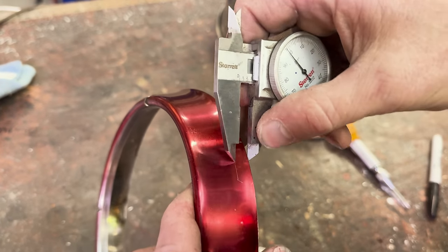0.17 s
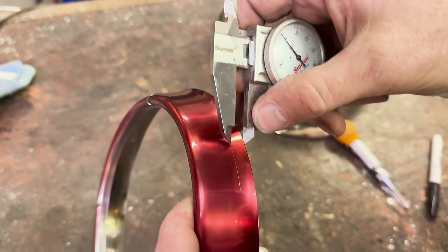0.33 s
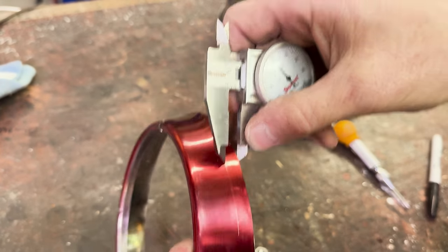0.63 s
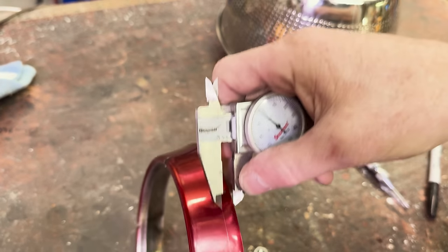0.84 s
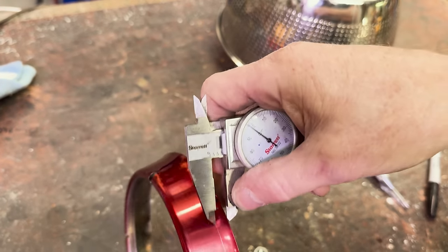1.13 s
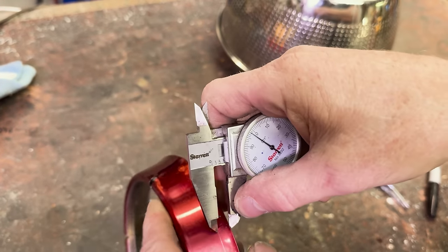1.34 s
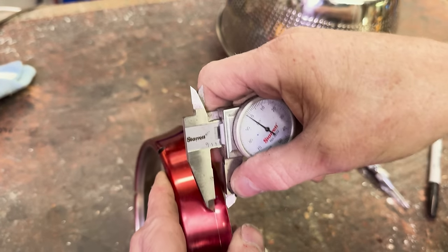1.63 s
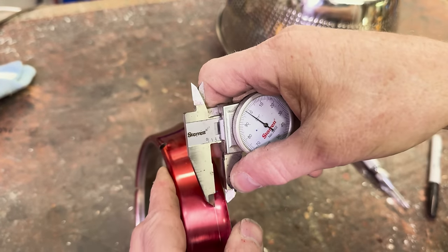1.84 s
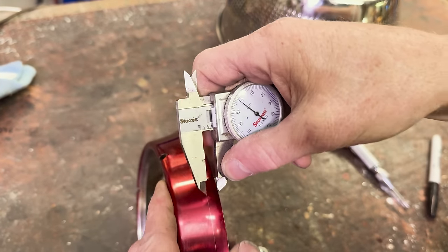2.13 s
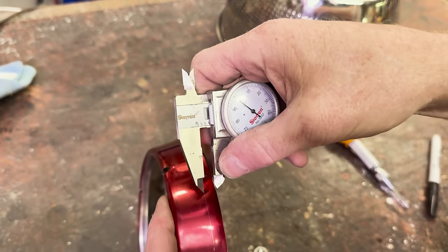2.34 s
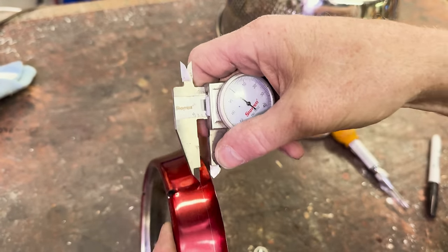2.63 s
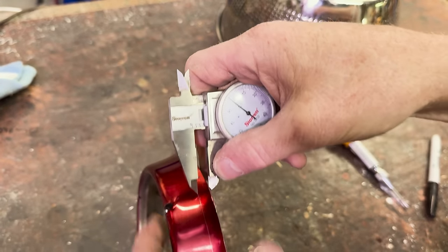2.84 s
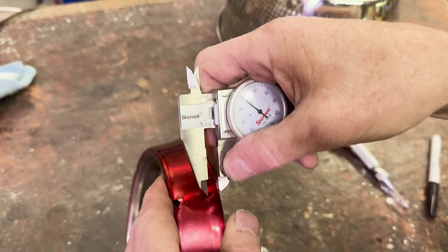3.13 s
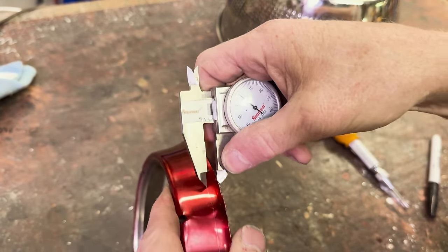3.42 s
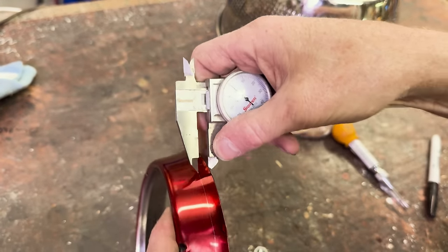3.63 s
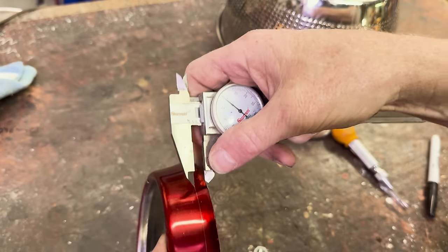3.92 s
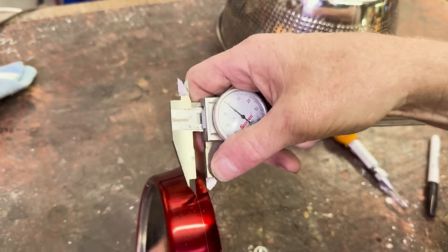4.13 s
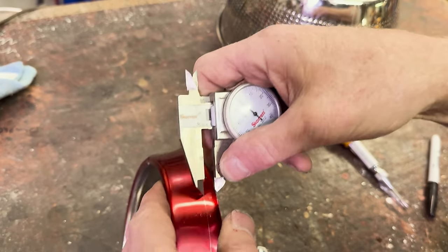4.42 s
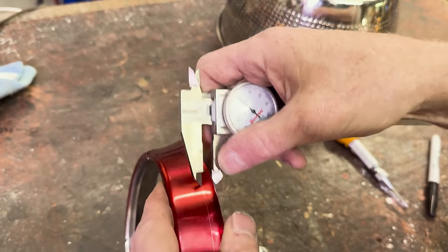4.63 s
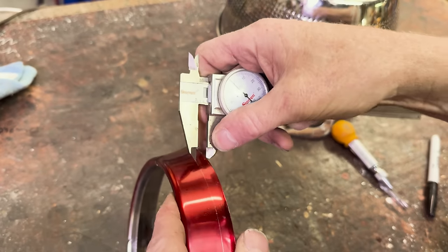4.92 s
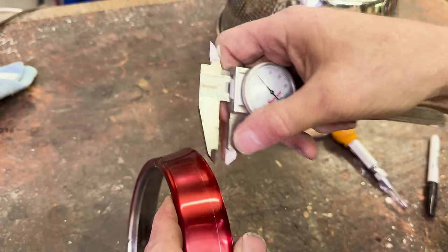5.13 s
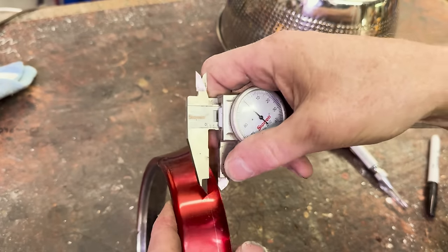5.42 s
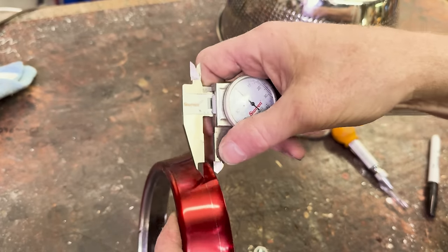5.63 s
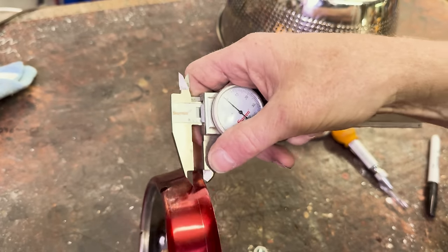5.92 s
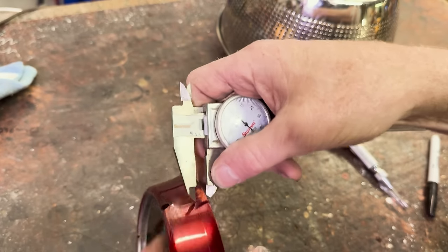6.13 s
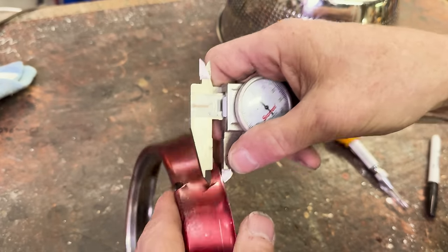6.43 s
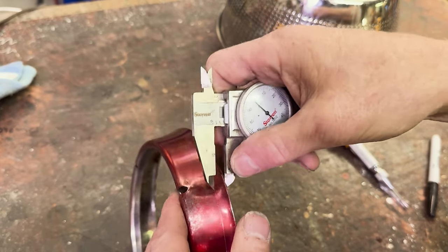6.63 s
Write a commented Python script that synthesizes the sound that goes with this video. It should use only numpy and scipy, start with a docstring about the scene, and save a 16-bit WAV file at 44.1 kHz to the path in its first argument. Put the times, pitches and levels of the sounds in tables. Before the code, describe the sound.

Close to a phone in a small workshop, a steel tip works on a hand-held metal ring over quiet low air rumble and faint motor hum. From 0 to 0.6 s, quick gritty scratches mix with small ticks. Light hissing skims, soft bumps and faint breath-like swishes follow, with a clear click at 1.5. Weak scrapes run from 1.9 to 2.4, then a brighter one at 2.5. A sharp tick at 3.0 leads to stronger, ringing scratches from 3.3 to 3.6, a tap at 3.64 and brief scrapes to 3.95. Thin skims and ticks fill 4.0 to 4.4. A loud crack at 4.6 starts two rough strokes; after a soft lull, two harder cracks hit around 5.35, followed by scratches until 5.9. Fine, fading hisses and a tiny tap end it by 7 s. The ring sounds short and damped, with slight room reflections.

```python
"""A caliper's jaw tip scribes a hand-held steel ring in short strokes, close to a phone above a workbench. The
tip sticks and slips in dense tiny jerks that ring the hand-damped ring and the bright jaws. Between strokes it
skims lightly, giving a fine hiss, or taps down and chatters with a dry crack. Faint breath-like swishes and
dull bumps join in, some as hard taps push the whole ring, others as the hands shift; a small workshop adds
reflections, air rumble and a low hum. A soft limit rounds the loudest peaks, and the top treble is cut."""
import sys
import numpy as np
from scipy import signal
from scipy.fft import rfft, irfft
from scipy.io import wavfile
from scipy.ndimage import uniform_filter1d

SR = 44100
rng = np.random.default_rng(int(sys.argv[2]) if len(sys.argv) > 2 else 0)


def materialize(psi):
    """Save the field psi as 16-bit PCM at rate SR to the path in sys.argv[1].

    A 1-D psi becomes a single channel; in a 2-D psi each row is a channel.
    """
    bounded = np.clip(np.atleast_2d(psi).T, -1, 1)
    quanta = np.round(bounded * 32767).astype(np.int16)
    wavfile.write(sys.argv[1], SR, quanta)


N = 298557

# pressed strokes: start_s, attack_s, hold_s, release_s, jaw_level_db (before a trim),
# ring_db (relative to the jaws, halfway), dig_db (what the ring gains as the tip digs in)
PRESSED_STROKES = [(0.072, 0.018, 0.038, 0.058, -37, 1, 7), (0.195, 0.044, 0.081, 0.064, -34.5, 4, -5.5),
                   (0.322, 0.037, 0.053, 0.11, -33, 3, -3), (0.502, 0.042, 0.0045, 0.023, -35.5, 5, -7.5),
                   (1.9, 0.077, .02, 0.023, -45, 9, 3), (1.996, 0.012, .1, 0.15, -46, 0.5, 5.5),
                   (2.162, 0.032, 0.12, 0.072, -51.5, 0, -1.5), (2.291, 0.035, 0.05, 0.19, -49, -0.5, 1.5),
                   (2.468, 0.04, 0.046, 0.079, -34.5, -7, 8.5), (3.271, 0.08, 0.028, 0.023, -33, -4.5, 5),
                   (3.453, 0.018, 0.03, .04, -43, -2.5, -14), (3.49, 0.087, 0.034, 0.061, -28, 3, -4.5),
                   (3.829, 0.016, 0.0064, 0.033, -48.5, -2, 6), (3.878, 0.015, 0.031, 0.024, -37, -5.5, 6),
                   (3.905, 0.019, 0.0088, 0.012, -36.5, 4, -3.5), (4.62, .008, 0.088, 0.12, -31.5, -6, 3),
                   (4.73, 0.028, 0.04, 0.052, -35.5, -4, -11), (4.897, 0.071, 0.0046, 0.045, -50, -3.5, 7),
                   (5.375, .005, .01, 0.057, -38, -24, -7), (5.472, 0.051, 0.057, 0.036, -29.5, -0.5, -3.5),
                   (5.724, 0.036, 0.023, 0.067, -34, 1.5, 0), (5.794, 0.025, 0.019, 0.1, -37.5, 4, -5.5)]
# how the tip bites from each time on: start_s, midrange_db, slip_unevenness_db
TIP_GRIPS = [(0, -5.5, 2), (1.8, -0.5, 2.5), (2.4, -1, 1.5), (3.2, -2.5, 1.5), (4.5, -2.5, 0.5),
             (5.4, -3.5, 1.3), (5.7, -3, 3.5)]
# the tip skims with almost no pressure: start_s, attack_s, hold_s, release_s, level_db (before trims)
LIGHT_SKIMS = [(0.598, 0.012, 0.028, 0.19, -55.5), (0.784, 0.017, .015, 0.27, -68.5),
               (1.023, 0.051, 0.091, 0.055, -57.5), (1.208, 0.059, .02, 0.14, -53.5),
               (1.377, 0.017, .005, 0.084, -60), (1.468, 0.021, 0.019, 0.09, -52),
               (2.693, 0.061, 0.014, 0.097, -50.5), (2.892, .018, 0.055, 0.0067, -49.5),
               (3.772, 0.018, .003, 0.057, -55.5), (4.034, 0.012, 0.016, 0.11, -51.5),
               (4.078, 0.027, .015, .08, -53.5), (4.161, 0.023, .01, 0.041, -55.5),
               (4.227, 0.014, 0.038, 0.092, -43.5), (4.489, .015, .015, 0.037, -73),
               (5.937, 0.03, 0.0086, 0.067, -57.5), (6.005, 0.024, .005, 0.055, -49.5),
               (6.061, 0.032, 0.011, 0.04, -54), (6.131, 0.0046, 0.015, 0.099, -41),
               (6.205, 0.023, .01, 0.1, -47.5), (6.365, 0.023, 0.055, .08, -70.5),
               (6.529, .011, 0.0075, 0.047, -49.5), (6.635, 0.016, 0.026, .04, -65),
               (6.731, 0.016, 0.017, .04, -67)]
# the tip lands or catches: start_s, jaw_level_db, midrange_level_db, ring_level_db
TIP_TAPS = [(0.003, -43.5, -52.5, -41), (0.052, -53, -56, -45), (0.0731, -45, -47, -38),
            (0.089, -28.5, -55, -34), (0.211, -42, -51, -38.5), (0.234, -62, -43, -36),
            (0.441, -47, -42, -25.5), (0.46, -50.5, -43, -44), (0.490, -45, -41, -32.5),
            (0.542, -41, -40, -32.5), (0.562, -44, -43, -35.5), (0.8958, -40.5, -54, -40.5),
            (0.933, -61, -56, -50), (1.5096, -30, -36, -36), (1.703, -78, -82, -60),
            (1.8884, -79, -70, -53), (1.9098, -61, -77, -47.5), (2.9739, -25, -36, -39),
            (3.257, -45, -61.5, -57), (3.2818, -73, -64, -39.5), (3.4187, -46, -51, -45.5),
            (3.476, -38, -43, -33), (3.642, -29, -33.5, -26), (3.823, -50, -60, -45),
            (3.9199, -33, -33, -22.5), (4.2863, -44, -37.5, -32), (4.363, -53, -54.5, -41),
            (4.369, -33.5, -39.5, -39.5), (4.609, -15, -18.5, -16.5), (5.3475, -17.5, -21, -19.5),
            (5.375, -11, -16, -17), (5.682, -54, -46, -51), (5.699, -44, -48, -43), (5.7425, -35, -43, -30),
            (6.642, -65, -66, -47.5)]
# modes of the ring (low) and the caliper jaws (high): pitch_hz, width_hz (before damping), level_db
STEEL_MODES = [(500, 320, -7), (893, 327, 0), (1094, 240, -3.5), (1343, 76, -2.5), (1684, 200, 0.5),
               (1903, 480, 1.5), (2230, 290, 3.5), (2523, 430, 1.5), (3260, 83, -19.5), (3645, 120, -7.5),
               (4080, 190, -4.5), (4460.0, 140, -4.5), (4900, 1000, -13.5), (5985, 210, -11.5),
               (6430, 200, -11.5), (7057, 54, -4), (7356, 140, -4), (7714, 190, -4.5), (8100, 373.0, -8),
               (8560, 220, -7), (8870, 170, -8.5), (9310, 510, -8), (10140, 390, -10), (11070, 530, -12.5),
               (11930, 170, -8.5), (11880, 270, -15), (13000, 210, -9.5), (14000, 300, -17),
               (14370, 211.0, -26)]
# spectrum of the workshop air: pitch_hz, relative_level_db (per Hz)
SHOP_AIR = [(25, -44.5), (40, -21.5), (58, 1), (110, 0), (170, -3.5), (260, -15.5), (400, -21), (1000, -21),
            (2500, -28.5), (6000, -37), (12000, -49.5), (16000, -63.5)]
# motor hum lines: pitch_hz, level_db (rms, before wavering)
MOTOR_HUM = [(94.7, -64), (122, -68)]
# room tail: pitch_hz, t60_s
ROOM_DECAY = [(200, 0.61), (1000, 0.27), (3000, 0.32), (8000, 0.33), (16000, 0.11)]
# each hold of the fingers deadens one resonance and leaves four free, until the next hold:
# start_s, deadened_hz, free_hz (four columns), emphasis_db
FINGER_HOLDS = [(0, 1700, 1260, 2080, 2146, 7960, 6.6), (0.7, 3200, 1650, 2100, 6200, 7740, 6),
                (1.4, 3200, 1450, 1690, 2660, 5910, 20), (1.6, 537, 340, 800, 1140, 2560, 5.9),
                (2.4, 1400, 890, 2210, 4330, 6950, 6.1), (2.97, 8400, 1643, 5130, 5630, 6240, 22.7),
                (3.2, 1400, 1060, 1850, 4180, 12900, 4.3), (3.75, 1520, 1050, 2070, 2240, 4270, 7.6),
                (4.1, 5000, 1440, 1850, 2530, 3540, 14.5), (4.55, 1950, 2680, 3650, 7150, 8570, 8.1),
                (4.615, 2100, 970, 2580, 8250, 12750, 3.2), (5.3, 5200, 2430, 3440, 4250, 7930, 11),
                (5.45, 6400, 920, 1980, 7400, 8300, 3.1), (5.92, 4630, 2400, 5900, 7200, 8400, 6.7)]
# dull bumps, as hard taps push the whole ring or the hands shift their hold: start_s, pitch_hz, level_db
DULL_BUMPS = [(0.908, 111, -44), (0.938, 181, -44), (0.976, 160, -50), (1.037, 159, -44.5),
              (1.057, 94.5, -46), (1.801, 91, -48.5), (2.729, 90.5, -42.5), (3.92, 211, -46.5),
              (4.609, 128, -45), (4.642, 63.7, -48), (5.348, 284, -46), (5.377, 137, -42.5),
              (5.81, 200, -46), (6.644, 205, -52.5)]
# faint breath-like swishes: start_s, attack_s, hold_s, release_s, level_db, centre_hz
SOFT_SWISHES = [(0.681, 0.17, 0.18, 0.17, -67, 1400), (1.0, 0.15, 0.32, 0.19, -73, 2300),
                (1.368, 0.048, 0.14, 0.072, -55.5, 2160), (2.617, 0.048, 0.11, 0.083, -67.5, 1810),
                (2.963, 0.011, 0.034, 0.093, -54.5, 5000), (4.005, 0.16, 0.23, 0.17, -72, 2880),
                (4.834, .05, 0.09, 0.17, -57.5, 2380), (5.13, 0.083, 0.27, .05, -65.5, 2100),
                (5.948, 0.17, 0.13, 0.38, -66.5, 2320), (6.402, 0.062, .2, 0.14, -70.5, 1014)]

SHOP_DB = -58
RING_TOP_HZ, JAW_BOTTOM_HZ, TOP_HZ = 2800, 6800, 15800
FREE_WIDTH_HZ, DEAD_WIDTH_HZ = 120, 160
# every contact or swish swells from SWELL_DB below full; its release time takes it RELEASE_DB down
SWELL_DB, RELEASE_DB, SWELL_CURVE = 24, 25, 1.33
# the pressure wavers as the tip meets high spots
WAVER_DB, WAVER_PER_S = 1.2, 140
SKIM_DAMPING = 0.6  # factor on the mode widths
PEAK_LIMIT = 0.7  # full scale is 1
SIZE = 4096  # samples in an impulse response
TIME = np.arange(N) / SR
FREQS = np.arange(SIZE // 2 + 1) * SR / SIZE + 1  # 1 Hz up, to avoid zero


def undb(db):
    """Decibels to gain."""
    return 10 ** (np.asarray(db) / 20)


def unit(x):
    """Scale to rms 1."""
    return x / np.sqrt(np.mean(x ** 2))


def add(out, x, start_s):
    """Mix x into out from a time on."""
    i = max(int(start_s * SR), 0)
    out[i:i + len(x)] += x[:max(N - i, 0)]


def walk(count, per_s):
    """Random levels, per_s a second, joined by straight lines."""
    at = np.arange(count) * per_s / SR
    levels = rng.standard_normal(size=4096)
    return np.interp(at, np.arange(len(levels)), levels)


def resonance(hz, width_hz):
    """Power response of one mode, 1 at its centre."""
    detuning = (FREQS ** 2 - hz ** 2) / (FREQS * width_hz)
    return 1 / (1 + detuning ** 2)


def ringing(power):
    """Causal (minimum-phase) impulse response of unit energy with this power spectrum."""
    cepstrum = irfft(np.log(power + 1e-9) / 2)
    # folding the cepstrum onto positive times makes the response causal
    cepstrum[1:SIZE // 2] *= 2
    cepstrum[SIZE // 2 + 1:] = 0
    h = irfft(np.exp(rfft(cepstrum)))
    return h / np.linalg.norm(h)


def touch(start_s, dead_share=1.07):
    """Power emphasis of the resonances that the fingers leave free or deaden at this time."""
    _, dead_hz, *free_hz, emphasis_db = [row for row in FINGER_HOLDS if row[0] <= start_s][-1]
    boost = undb(emphasis_db) ** 2 - 1
    cut = undb(dead_share * emphasis_db) ** 2 - 1
    free = 1 + boost * sum(resonance(hz, FREE_WIDTH_HZ) for hz in free_hz)
    return free / (1 + cut * resonance(dead_hz, DEAD_WIDTH_HZ))


def steel(start_s, damping=1, radiate_hz=330):
    """Impulse responses of the jaws, the midrange and the ring's low modes, as held at this time."""
    modes = sum(undb(db) ** 2 * resonance(hz, width_hz * damping) for hz, width_hz, db in STEEL_MODES)
    # so narrow a ring radiates little bass
    power = touch(start_s) * modes / (1 + (radiate_hz / FREQS) ** 2)
    ring = 1 / (1 + (FREQS / RING_TOP_HZ) ** 20)
    below_jaws = 1 / (1 + (FREQS / JAW_BOTTOM_HZ) ** 20)
    shares = (1 - below_jaws, below_jaws * (1 - ring), ring)
    return [ringing(power * share) for share in shares]


def mixed_steel(start_s, damping, levels_db):
    """One impulse response from the jaws, midrange and ring at these levels."""
    return sum(undb(db) * part for db, part in zip(levels_db, steel(start_s, damping)))


def slips(count, per_s, spread_db):
    """Stick and slip: tiny jerks at random moments, of scattered size and either sign."""
    hit = rng.random(count) < per_s / SR
    size = undb(spread_db * np.clip(rng.standard_normal(count), -2, 2))
    sign = rng.choice([-1, 1], count)
    return unit(hit * size * sign + 1e-9)


def contact(attack_s, hold_s, release_s):
    """Swell, hold and release in dB, the progress from -1 to 0 up to the release, and soft ends."""
    lifts_s = attack_s + hold_s
    t = np.arange(0, lifts_s + 1.5 * release_s, 1 / SR)
    swell_db = -SWELL_DB * np.maximum(1 - t / attack_s, 0) ** SWELL_CURVE
    lift_db = -RELEASE_DB * np.maximum(t - lifts_s, 0) / release_s
    progress = np.minimum(t / lifts_s, 1) - 1
    fade = np.clip(np.minimum(t, t[-1] - t) / .001, 0, 1)
    return swell_db + lift_db, progress, fade


def workshop(swell_db=3.1, waver_db=2.5):
    """Low air rumble is shaped noise that swells; motor hum is sines wavering in level and phase."""
    hz, db = np.transpose(SHOP_AIR)
    f = np.arange(N // 2 + 1) * SR / N + 1
    spectrum = undb(np.interp(np.log(f), np.log(hz), db))
    air = unit(irfft(rfft(rng.standard_normal(N)) * spectrum, N))
    hum = np.zeros(N)
    for line_hz, line_db in MOTOR_HUM:
        level = undb(line_db + waver_db * walk(N, 14.0))
        hum += level * np.sin(2 * np.pi * line_hz * TIME + walk(N, 21.0))
    return air * undb(SHOP_DB + swell_db * walk(N, 9.1)) + np.sqrt(2) * hum  # rms to peak


def tapping(chatter_s=0.0013, settle_s=0.0045, crack_db=-6, crack_hz=3200):
    """The tip lands with a dry crack, buzzes against the steel for a few milliseconds and settles."""
    out, t = np.zeros(N), TIME[:SIZE // 2]
    crack = ringing(resonance(crack_hz, 2 * crack_hz))
    settling = np.exp(-np.maximum(t - chatter_s, 0) / settle_s)
    for start_s, jaw_db, mid_db, ring_db in TIP_TAPS:
        force = slips(len(t), 14000, spread_db=3.0) * settling
        h = mixed_steel(start_s, 0.6, (jaw_db, mid_db, ring_db))
        add(out, signal.fftconvolve(force, h + undb(mid_db + crack_db) * crack), start_s)
    return out


def room(x, wet_db=-15, build_s=0.0016):
    """Diffuse reflections build up and die away, each band of noise at its own rate, the top first."""
    t = TIME[:SR // 2]
    hz, t60_s = np.transpose(ROOM_DECAY)
    noise = rfft(rng.standard_normal(len(t)))
    f = np.arange(len(t) // 2 + 1) * SR / len(t) + 1
    tail = np.zeros(len(t))
    for share, decay_s in zip(np.eye(len(hz)), t60_s):
        band = irfft(noise * np.interp(np.log(f), np.log(hz), share), len(t))
        tail += band * np.exp(-np.log(1000) * t / decay_s)
    tail *= 1 - np.exp(-t / build_s)
    return undb(wet_db) * signal.fftconvolve(x, tail / np.linalg.norm(tail))[:N]


def scribing(jaw_trim_db=-1.0, slips_per_s=4500, catches_per_s=330):
    """The pressed tip jerks along, and its bite varies with the surface."""
    out = np.zeros(N)
    for start_s, attack_s, hold_s, release_s, full_db, full_bite_db, dig_db in PRESSED_STROKES:
        pressure_db, progress, fade = contact(attack_s, hold_s, release_s)
        _, mid_db, uneven_db = [grip for grip in TIP_GRIPS if grip[0] <= start_s][-1]
        count = len(fade)
        level_db = full_db + pressure_db + WAVER_DB * walk(count, WAVER_PER_S)
        bite_db = full_bite_db + dig_db * (progress + .5)
        force = slips(count, slips_per_s, spread_db=2) * undb(uneven_db * walk(count, catches_per_s))
        # the force is levelled over a few hundredths of a second, so each stroke keeps its set level
        force = fade * force / np.sqrt(uniform_filter1d(force ** 2, size=1000) + 1e-9)
        levels_db = (level_db + jaw_trim_db, level_db + bite_db / 2 + mid_db, level_db + bite_db)
        for h, db in zip(steel(start_s, damping=0.55), levels_db):
            # the tip rocks, so the force is shared unevenly between jaws, midrange and ring
            rocking = unit(undb(0.56 * walk(count, 150)))
            add(out, signal.fftconvolve(force * rocking * undb(db), h), start_s)
    return out


def skimming(jaw_db=-1, mid_db=-14, ring_db=-20):
    """A light touch gives a fine hiss of dense slips that rings mainly the free jaws."""
    out = np.zeros(N)
    for start_s, attack_s, hold_s, release_s, level_db in LIGHT_SKIMS:
        pressure_db, _, fade = contact(attack_s, hold_s, release_s)
        h = mixed_steel(start_s, SKIM_DAMPING, (jaw_db, mid_db, ring_db))
        flicker = unit(undb(1.5 * walk(len(fade), 260)))
        force = slips(len(fade), 6000, spread_db=3.5) * flicker
        add(out, signal.fftconvolve(force * fade * undb(level_db + pressure_db), h), start_s)
    return out


def swishes(width_share=1.0, soft_hz=6500):
    """Soft, broad swishes, like faint breath: dense noise through one wide resonance."""
    out = np.zeros(N)
    for start_s, attack_s, hold_s, release_s, level_db, hz in SOFT_SWISHES:
        swell_db, _, fade = contact(attack_s, hold_s, release_s)
        h = ringing(resonance(hz, hz * width_share) / (1 + (FREQS / soft_hz) ** 10))
        # random impulses this dense are heard as noise
        noise = slips(len(fade), 9000, spread_db=2.5)
        add(out, signal.fftconvolve(noise * fade * undb(level_db + swell_db), h), start_s)
    return out


def bumping(swell_s=0.0071):
    """Dull bumps, short swelling and dying sines, as hard taps push the whole ring or the hands shift their
    hold."""
    out, t = np.zeros(N), TIME[:SIZE]
    envelope = t / swell_s * np.exp(1 - t / swell_s)  # peaks at 1
    for start_s, hz, db in DULL_BUMPS:
        add(out, undb(db) * envelope * np.sin(2 * np.pi * hz * t), start_s)
    return out


def scene():
    """Scribed steel and soft swishes, their reflections, the dull bumps and the workshop."""
    close = tapping() + scribing() + skimming() + swishes()
    return (workshop() + close + room(close) + bumping())[None]


def record(dry):
    """A soft limit rounds the loudest peaks, and the top treble is cut."""
    rounded = PEAK_LIMIT * np.tanh(dry / PEAK_LIMIT)
    top_cut = signal.ellip(10, .2, 70, TOP_HZ, fs=SR, output="sos")
    return signal.sosfilt(top_cut, rounded)


dry = scene()
out = record(dry)
materialize(out)
```